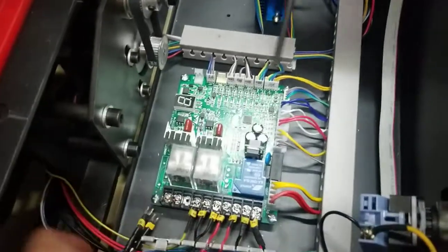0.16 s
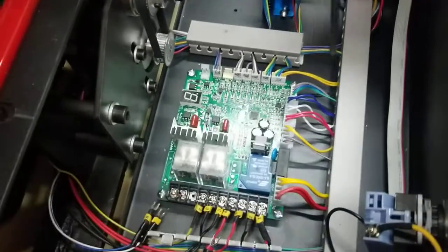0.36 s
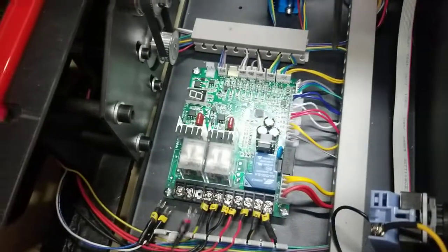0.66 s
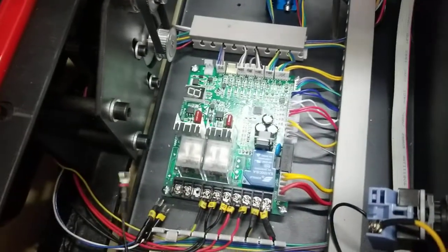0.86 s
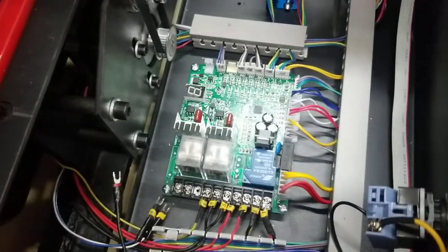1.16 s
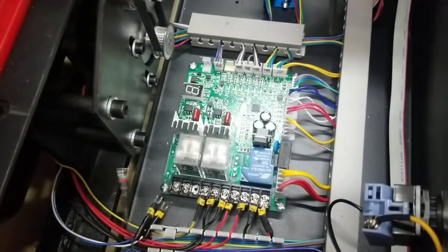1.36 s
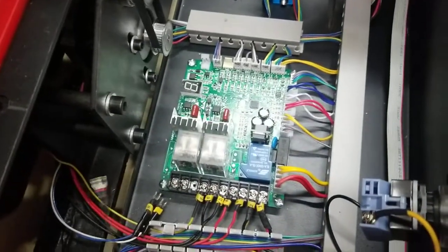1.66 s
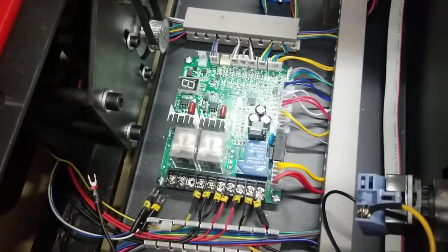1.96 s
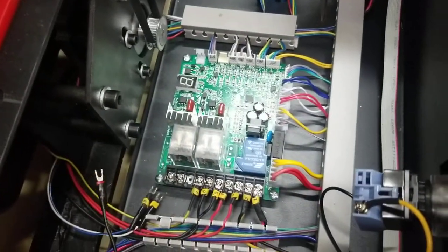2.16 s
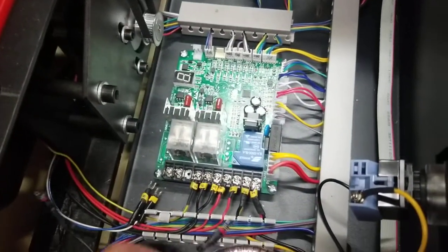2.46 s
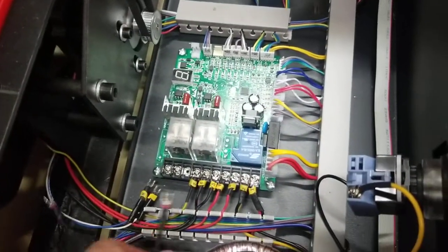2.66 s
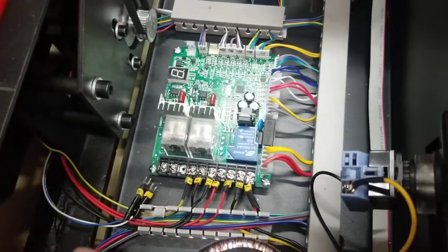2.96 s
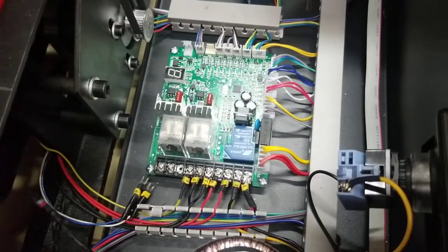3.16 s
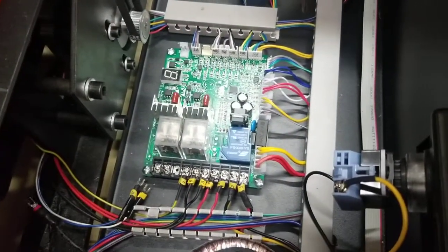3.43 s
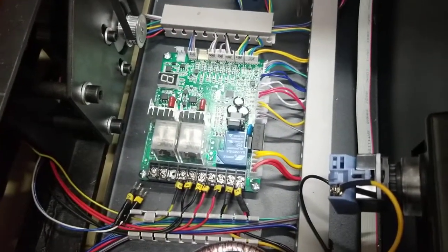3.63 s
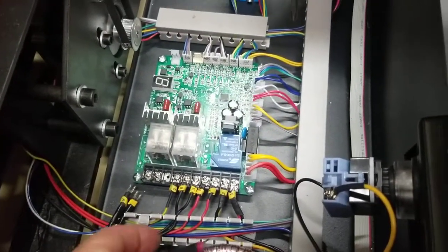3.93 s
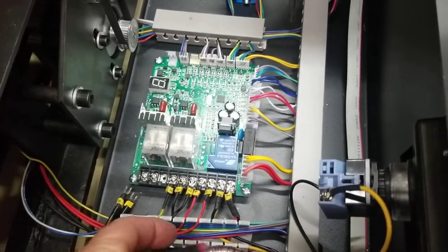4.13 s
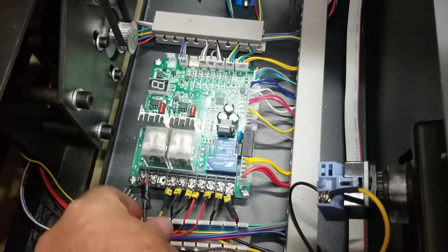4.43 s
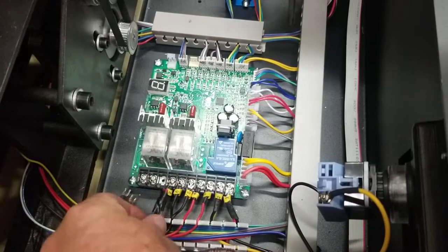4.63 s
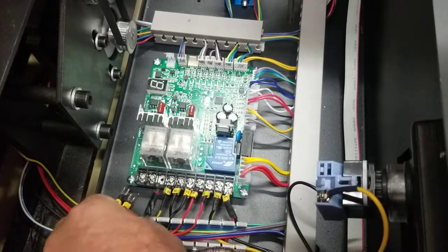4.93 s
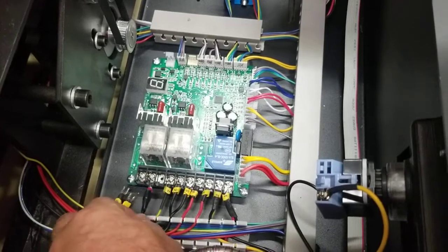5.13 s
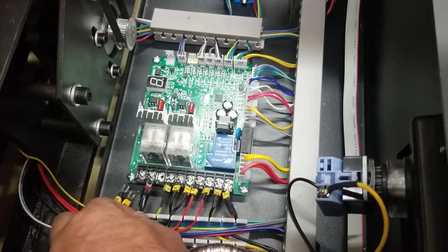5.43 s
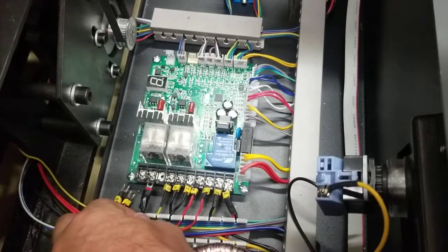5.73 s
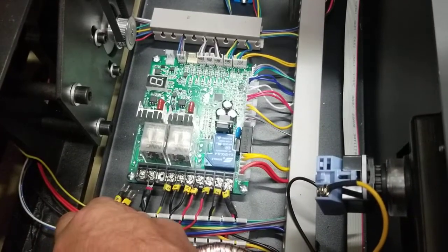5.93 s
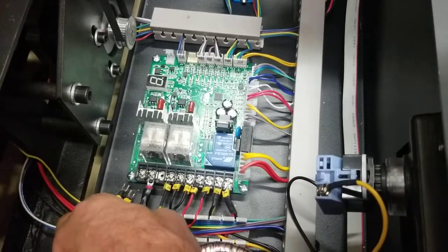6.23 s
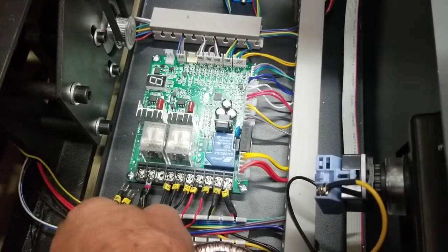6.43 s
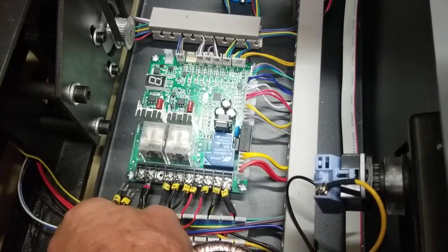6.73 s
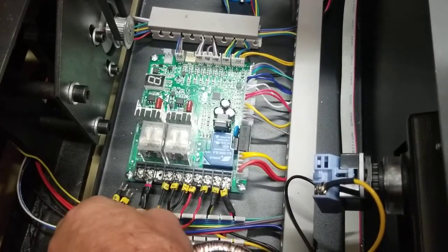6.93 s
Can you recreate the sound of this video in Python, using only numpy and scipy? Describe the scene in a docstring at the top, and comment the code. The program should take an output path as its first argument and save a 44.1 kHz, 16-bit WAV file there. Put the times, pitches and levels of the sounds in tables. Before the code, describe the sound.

A low, steady hum from a machine runs throughout, swelling slightly around 3 seconds and near the end. At the start there is a short scratchy slide and a light screwdriver clink at about 0.3 seconds. From 0.5 to 0.8 seconds stiff wires knock and rub against the cabinet housing, which rings briefly and hollowly. Scattered small ticks of metal terminals, bumps and dry snaps follow, with a very faint high whine between 1 and 2.7 seconds. The handling gets busy from 2.6 seconds, with the loudest knocks and scrapes around 2.9 to 3.1 seconds. More rubbing and knocking comes near 3.6 seconds, and softer scrapes near 4.5. After that it is quieter: dull fingertip bumps and tiny metal clicks from 6 to 7 seconds as wires go under screw terminals. The handling is close and toward the left.

```python
"""Loose wires rub over plastic ducts in a machine cabinet; at the start a screwdriver slides and then clinks.
The wires are pulled about and fed under screw terminals: their insulation sticks and slips, they knock on the
housing, which rings, and their crimped metal forks tick. Fingertips bump the wiring. A low hum runs throughout;
a faint whine comes and goes. The hand works close to the left microphone."""
import sys
import numpy as np
from scipy import signal
from scipy.fft import rfft, irfft
from scipy.io import wavfile
from scipy.ndimage import uniform_filter1d

SR = 44100
rng = np.random.default_rng(int(sys.argv[2]) if len(sys.argv) > 2 else 0)


def to_wav(s):
    """Save 16-bit WAV."""
    ch = np.atleast_2d(s).T  # columns
    pcm = np.round(np.clip(ch, -1, 1) * 32767)  # PCM
    wavfile.write(sys.argv[1], SR, pcm.astype(np.int16))


N = 312667
TIME_S = np.arange(N) / SR
RING_S = np.arange(2 ** 14) / SR  # from an impact
STROKE_S = np.arange(2 ** 15) / SR - .04  # around a slide's start

# Wire knocks. Each row: time in seconds, peak level in dB, treble against the body in dB.
KNOCKS = [(0.545, -26.5, -16), (0.564, -22, -17), (0.661, -27.5, -7.5), (0.687, -28.5, -9),
          (1.111, -35, -17), (1.4516, -33.5, -24), (1.597, -21.5, -15), (2.263, -20.5, -14.5),
          (2.664, -27.5, -14), (2.711, -21.5, -15), (2.891, -11.5, -16), (2.903, -15.5, -15),
          (3.019, -11.5, -6), (3.0248, -13.5, -5), (3.0913, -17.5, -5), (3.103, -23, -16.5),
          (3.596, -32, -12.5), (3.634, -23, -12.5), (3.669, -25.5, -14.5), (4.451, -29.5, -14.5),
          (4.531, -37.5, -10)]
# Slides. Each row: start and length in seconds, drag and fizz in dB, easing in dB per second. The first row is
# the screwdriver's shaft sliding; the rest are wires.
SLIDES = [(0.0, 0.37, -44.5, -44.5, 70), (0.36, 0.13, -61.5, -69, 18), (0.506, 0.0091, -46.5, -65.5, -10),
          (0.571, 0.015, -28.5, -52.5, 89), (0.667, 0.061, -30.5, -50.5, 27),
          (0.766, 0.058, -37, -61.5, 25), (0.99, 0.11, -57, -84, -18), (1.21, 0.088, -59.5, -69.5, 34),
          (1.449, 0.13, -41.5, -64, 87), (1.854, 0.0068, -62.5, -68.5, 56), (2.176, 0.01, -52.5, -76, 6),
          (2.225, 0.021, -47, -87, 8), (2.33, 0.23, -43.5, -71.5, 45), (2.667, 0.082, -32.5, -58, 46),
          (2.825, 0.05, -38, -59.5, -17), (2.918, 0.15, -30.5, -57.5, 23), (3.055, 0.085, -32.5, -59.5, 61),
          (3.519, 0.022, -41.5, -75, -7), (3.555, 0.16, -35, -60.5, 16.5), (3.733, 0.039, -52, -67, 32),
          (3.781, 0.0089, -36.5, -69, 38.5), (4.436, 0.073, -39, -65.5, 10.5),
          (4.549, 0.066, -37.5, -66, 5.5), (4.661, 0.044, -50, -83, 121.5), (5.576, 0.048, -62, -73.5, 5.5),
          (6.455, 0.1, -56.5, -65.5, 58), (6.888, 0.018, -72.5, -71, 59), (7.045, 0.0405, -45.5, -64, 101)]
# Fork contacts. Each row: time in seconds, peak level, mid tilt and top tilt in dB, pitch in Hz.
FORK_TICKS = [(1.099, -62, -20, -32, 6070), (1.225, -38, -8, -35, 5910), (1.452, -42, -10.5, -14, 7530),
              (1.535, -57, -21, -14, 9800), (2.6717, -42.5, -11, -19, 6140), (2.7522, -46.5, 3, -22, 4860),
              (2.7691, -42, -2.5, -21, 5140), (2.81, -42, 4, -17, 2960), (2.8238, -46, 4, -11, 2760),
              (2.852, -49, -11, -19.5, 3114), (2.891, -36.5, -4.5, -5, 12050),
              (3.0536, -49, -2, -8.5, 3400), (3.811, -48.5, -19.5, -37.5, 6580),
              (4.231, -63.5, -1.5, -25, 3220), (4.433, -59, -5, -27, 4900), (6.41, -66, -14.5, -29, 6990),
              (6.4445, -49.5, -13, -16, 7900), (6.4542, -48.5, -9.5, -28.5, 5380),
              (6.5156, -58, 2, 2.5, 12200), (6.543, -52, 0.5, -10, 12350), (6.629, -71.5, -4, -12.5, 5250),
              (6.872, -53, -8.5, -22, 2865), (6.88, -59, 5.5, -20, 6160), (7.01, -65.5, -2, -22, 4440),
              (7.038, -52, -9, -22, 4000)]
# Finger bumps and screwdriver contacts. Each row: time in seconds, peak level in dB.
FINGER_TAPS = [(0.946, -45.5), (2.221, -42.5), (2.629, -37.5), (4.202, -46), (5.031, -50), (5.252, -65.5),
               (5.599, -59), (6.165, -37.5), (6.972, -56), (7.036, -40.5)]
CLINKS = [(0.3025, -45.5), (0.3261, -46), (0.3455, -45.5)]
# Dry snaps. Each row: time in seconds, level in dB, high-pass cutoff in Hz.
SNAPS = [(0.223, -34, 6260), (0.58, -38, 6000), (1.147, -50, 6100), (2.1328, -34.5, 500),
         (3.637, -35, 10000), (3.705, -51, 7000), (3.728, -41, 7000)]
# Swell of the hum. Each row: time in seconds, level in dB.
HUM_SWELL = [(0.0, -46), (1.72, -48), (3.12, -39.5), (4.34, -45.5), (4.64, -47.5), (6.65, -39), (7.09, -40)]
# Cabinet resonances. Each row: frequency in Hz, height in dB, width in Hz.
CABINET_MODES = [(182.7, 21.5, 2.3), (209.6, 26.5, 4), (226, 14.5, 5.7), (250, 12.5, 13),
                 (266.4, 15.5, 2.1), (320.2, 18, 5.3), (381.1, 10.5, 6), (424, 7.5, 18), (437, 6.5, 29),
                 (472, 14, 12), (583, 4.5, 11), (635.8, 15, 26), (702.5, 3, 12), (738, 13, 13),
                 (853, 14, 65), (961, 8.5, 16), (974, 15.5, 35), (1045, 19.5, 46), (1189, 14, 55),
                 (1352, 12.5, 110), (1498, 10.5, 22), (1603, 11, 56), (1697, 11, 18), (1846, 10, 19),
                 (2150, 7.5, 440), (2466, 6, 230), (2827, 8, 81), (3015, 9, 50), (3446, 5, 430)]
# Cabinet's late decay. Each row: band centre in Hz, T60 in seconds.
CABINET_TAIL = [(150, .55), (500, 0.71), (1200, 0.21), (3500, 0.3), (12000, 0.11)]
# Panel and screwdriver modes. Each row: frequency in Hz, level in dB, T60 in seconds.
PANEL_MODES = [(468.5, -14.5, 0.23), (694, -1, .11), (970.5, 1.5, 0.21), (1060, -11, .14),
               (1836, -19.5, .12), (2110, -37, .7)]
SHAFT_MODES = [(2120, -4.5, 0.15), (3880, 1, 0.07), (3910, 3.5, 0.13), (5780, -1, 0.11), (6270, -1, 0.15),
               (7400, -6, 0.12)]
# Source spectra. Each row: frequency in Hz, level in dB.
KNOCK_SPECTRUM = [(90, -28), (125, -4.5), (160, -13.5), (210, -2), (320, -1), (500, 3.5), (700, 7.5),
                  (1000, 4), (1300, -1), (1900, -18), (3000, -30), (4000, -31), (7000, -34.5),
                  (9000, -48.5), (12500, -44.5), (16000, -57.5)]
DRAG_SPECTRUM = [(90, -38.5), (125, 2.5), (160, -9.5), (210, -9.5), (320, 3), (450, -1), (630, 4.5),
                 (800, -5), (1000, -6), (1300, -9), (2000, -19), (3500, -34), (7000, -71.5)]
FIZZ_SPECTRUM = [(450, -19), (900, 0), (1900, 1.5), (2600, -1.5), (3700, -3.5), (5000, -3.5), (7200, -7.5),
                 (9000, -23), (13000, -15.5), (16000, -28.5)]
CRACKLE_SPECTRUM = [(600, -24), (1500, 10.5), (2400, 3), (3600, -1.5), (5000, -12.5), (7000, -12.5),
                    (9000, -33), (16000, -37.5)]
TICK_SPECTRUM = [(500, -12), (1500, -3.5), (3500, -7.5), (6500, -5.5), (7700, -8), (9000, -15.5),
                 (12500, 2), (16000, -7)]
TAP_SPECTRUM = [(150, -20), (400, 3), (650, 2.5), (1300, -18.5), (2000, -33.5), (9000, -57)]
RUMBLE_SPECTRUM = [(12, -46.5), (20, -30.5), (38, -27.5), (47, -12.5), (85, -11.5), (96, -11), (117, -2),
                   (131, -19), (146, -20), (323, -32.5), (566, -47), (630, -59), (1500, -62.5),
                   (1950, -104), (3300, -120)]
HISS_SPECTRUM = [(900, -11), (1800, 6.5), (2600, 2), (4000, 1), (7000, -2), (9000, -14), (12000, 3),
                 (16000, -1)]
# Treble loss in soft insulation. Each row: frequency in Hz, gain in dB.
CUSHION = [(1200, 2), (2400, -2), (7000, -24)]
# Brightening with firmer contact. Each row: frequency in Hz, gain in dB per dB of drag.
BITE = [(200, -0.29), (420, -0.1), (650, 0.028), (1100, 0.23), (2500, 0.29)]
# Likeness of the two microphones. Each row: frequency in Hz, correlation from 0 to 1.
MIC_CORRELATION = [(130, .99), (300, .95), (640, .55), (1400, .4), (3000, .1), (16000, 0)]
# Leftward lean of the handling. Each row: frequency in Hz, left minus right in dB.
HAND_LEAN = [(150, 1.5), (380, 2), (600, 7), (1200, 6.5), (2400, 8), (5000, 9.5), (9000, 6), (15000, 8)]


def wire_knocks(gain_db=-4, usual_treble_db=-19, soft_rise_s=0.0057, sharp_rise_s=0.00053):
    """Stiff wire hits the housing: light bumps swell softly, hard ones start at once and thud more."""
    out = np.zeros((2, N))
    hz, db = np.transpose(KNOCK_SPECTRUM)
    for time_s, peak_db, treble_db in KNOCKS:
        hardness_db = (treble_db - usual_treble_db) * curve([(1000, 0.22), (2500, 2.14), (5000, 0.8)], hz)
        thud_db = (peak_db + 28) * curve([(210, 0.03), (330, 0.063), (600, 0.025)], hz)
        blow = impulse(np.c_[hz, db + hardness_db + thud_db], early_t60_s=.08, tail_db=-16, direct=4)
        rise_s = np.interp(peak_db, [-34, -20], [soft_rise_s, sharp_rise_s])
        knock = strike(blow, 0, rise_s) + panel_ring()
        add(out, time_s, strike(knock, peak_db + gain_db, rise_s))
    return out


def panel_ring(gain_db=-6):
    """The struck panel rings hollow in a few decaying modes."""
    hz, db, t60_s = np.transpose(PANEL_MODES)[:, :, None]
    decay = amp(gain_db + db - 60 * RING_S / t60_s)
    modes = decay * np.sin(2 * np.pi * (hz * RING_S + rng.random(hz.shape)))
    return modes.sum(0) * np.clip(3 - 3 * RING_S / RING_S[-1], 0, 1)


def wire_slides(fizz_gain_db=-1, crackle_gain_db=-26):
    """Insulation judders over duct edges: coarse slips shake the housing, fine ones fizz, some crackle."""
    rub, fizz_level, grip = np.zeros((2, N)), np.zeros((1, N)), np.zeros((1, N))
    coarse = unit(slips(rate_hz=1100, spread_db=1.5) * wander(spread_db=1, rate_hz=65))
    for start_s, length_s, drag_db, fizz_db, easing_db_per_s in SLIDES:
        onset_s = start_s + STROKE_S[0]
        contact = pressure(length_s, easing_db_per_s)
        force = contact * np.roll(coarse, -round(start_s * SR))[:len(STROKE_S)]
        add(rub, onset_s, housing_rub(force, drag_db))
        add(grip, onset_s, amp(drag_db) * contact[None])
        add(fizz_level, onset_s, amp(fizz_db) * pressure(length_s, 0.99 * easing_db_per_s)[None])
    fine = np.array([slips(rate_hz=12000, spread_db=4) for side in (0, 1)])
    fizz = fizz_level * np.sqrt(2) * unit(cabinet(colour(fine, FIZZ_SPECTRUM)))
    catch = impulse(CRACKLE_SPECTRUM, early_t60_s=.025, tail_db=-30)
    catch /= np.linalg.norm(catch[0])
    crackle = signal.fftconvolve(grip * slips(rate_hz=65, spread_db=2.5), catch, axes=1)[:, :N]
    return rub + amp(fizz_gain_db) * fizz + amp(crackle_gain_db) * crackle


def pressure(length_s, easing_db_per_s, release_db_per_s=306):
    """Contact force of one slide: it catches, eases while the wire runs, and lets go."""
    catch_s = 0.035 + 0.03 * length_s
    eased_db = easing_db_per_s * np.clip(STROKE_S, 0, length_s)
    released_db = release_db_per_s * np.clip(STROKE_S - length_s, 0, 1)
    return np.clip(1 + STROKE_S / catch_s, 0, 1) ** 2 * amp(-eased_db - released_db)


def slips(rate_hz, spread_db):
    """Stick-slip friction: a random train of tiny, uneven releases."""
    size = amp(spread_db * np.minimum(rng.exponential(1, N), 4)) * rng.choice([-1, 1], N)
    return unit(size * (rng.random(N) < rate_hz / SR))


def housing_rub(force, drag_db, firm_db=-26):
    """Slips enter the housing through the insulation; each spot differs, and gentle contact is duller."""
    body = impulse(DRAG_SPECTRUM, early_t60_s=.05, tail_db=-24, direct=12)
    body /= np.linalg.norm(body.mean(0))
    hz, bite = np.transpose(BITE)
    force = colour(colour(force, CUSHION), np.c_[hz, bite * (drag_db - firm_db)])
    return amp(drag_db) * signal.fftconvolve(force[None], body, axes=1)


def fork_ticks(gain_db=-3, ring_db=-7, t60_at_4khz_s=0.04):
    """Metal forks touch screws and each other: a click and a brief ring, shorter at higher pitch."""
    out = np.zeros((2, N))
    hz, db = np.transpose(TICK_SPECTRUM)
    for time_s, peak_db, mid_db, top_db, pitch_hz in FORK_TICKS:
        tilt_db = curve([(3500, mid_db + 5), (6000, 0.0033), (7700, 0.026), (12000, top_db + 7)], hz)
        click = impulse(np.c_[hz, db + tilt_db], early_t60_s=0.049, tail_db=-27)
        prong = np.sin(2 * np.pi * (pitch_hz * RING_S + rng.random((2, 1))))
        prong *= amp(-60 * RING_S / t60_at_4khz_s * pitch_hz / 4000)
        tick = unit(click) + amp(ring_db) * unit(prong)
        add(out, time_s, strike(tick, peak_db + gain_db, rise_s=.0016))
    return out


def finger_taps():
    """Fingertips bump the wiring: short, dull, too light to ring the panel."""
    out = np.zeros((2, N))
    for time_s, peak_db in FINGER_TAPS:
        bump = impulse(TAP_SPECTRUM, early_t60_s=0.15, tail_db=-20)
        add(out, time_s, strike(bump, peak_db, rise_s=0.0041))
    return out


def screwdriver(gain_db=-3, click_db=-3, detune=0.0108):
    """A steel shaft touches metal: a click, and modes that chatter as it scrapes."""
    out = np.zeros((2, N))
    hz, db, t60_s = np.transpose(SHAFT_MODES)[:, :, None]
    decay = amp(db - 60 * RING_S / t60_s)
    for time_s, peak_db in CLINKS:
        phase = rng.random((2, len(hz), 1))
        mode_hz = hz * (1 + detune * rng.standard_normal(hz.shape))
        ring = (decay * np.sin(2 * np.pi * (mode_hz * RING_S + phase))).sum(1)
        click = impulse(FIZZ_SPECTRUM, early_t60_s=.11, tail_db=-14)
        chatter = 1 + unit(uniform_filter1d(rng.standard_normal(ring.shape), size=130))
        clink = unit(ring * chatter) + amp(click_db) * unit(click)
        add(out, time_s, strike(clink, peak_db + gain_db, rise_s=0.00023))
    return out


def snaps(decay_s=0.00016):
    """Tiny dry snaps with no ring."""
    out = np.zeros((2, N))
    for time_s, db, cutoff_hz in SNAPS:
        burst = rng.standard_normal((2, len(RING_S))) * np.exp(-RING_S / decay_s)
        highpass = signal.butter(2, cutoff_hz, "high", fs=SR)
        add(out, time_s, amp(db) * signal.lfilter(*highpass, burst))
    return out


def wire_stirring():
    """Held wires never lie quite still: faint slips throughout."""
    force = wander(spread_db=4.5, rate_hz=13) * slips(rate_hz=520, spread_db=7)
    return housing_rub(force, drag_db=-75)[:, :N]


def impulse(spectrum, early_t60_s, tail_db, direct=0):
    """One impulse in the cabinet: optional direct pulse, quick reflections, a tail band by band."""
    size = len(RING_S)
    hz, centres_hz = np.fft.rfftfreq(size, 1 / SR), np.transpose(CABINET_TAIL)[0]
    pulse = direct * signal.unit_impulse(size, 70)
    noise = unit(colour(noise_pair(size) + pulse, spectrum))
    out = noise * amp(-60 * RING_S / early_t60_s)
    for share, (_, t60_s) in zip(np.eye(len(CABINET_TAIL)), CABINET_TAIL):
        band = irfft(rfft(noise) * curve(np.c_[centres_hz, share], hz), size)
        out += band * amp(tail_db - 60 * RING_S / t60_s)
    return cabinet(out) * np.clip(3 - 3.3 * RING_S / RING_S[-1], 0, 1)


def cabinet(x):
    """The cabinet's resonances ring; the balance between octaves is kept."""
    bins_hz, grid_hz = np.fft.rfftfreq(x.shape[-1], 1 / SR), np.geomspace(20, SR / 2, num=4000)
    gain = 1 + sum(amp(db) / (1 + 2j * (grid_hz - hz) / width_hz) for hz, db, width_hz in CABINET_MODES)
    gain /= np.sqrt(uniform_filter1d(abs(gain) ** 2, size=400))
    return irfft(rfft(x) * np.interp(bins_hz, grid_hz, gain), x.shape[-1])


def whine(centre_hz=5730, jitter_hz=14, level_db=-74.5, start_s=0.95, end_s=2.72):
    """A thin, faint whine flickers in level at a near-steady pitch."""
    knots_s = np.linspace(start_s, end_s, num=230)
    flicker = rng.uniform(.1, 1.9, len(knots_s)) * signal.windows.tukey(len(knots_s), .18)
    pitch_hz = centre_hz + jitter_hz * np.interp(TIME_S, knots_s, rng.standard_normal(len(knots_s)))
    tone = np.sin(2 * np.pi * np.cumsum(pitch_hz) / SR)
    return amp(level_db) * np.interp(TIME_S, knots_s, flicker) * tone


def hum_and_room(hum_hz=115.94, drone_hz=51.3, drone_db=-58, rumble_db=-48, hiss_db=-78):
    """A hum over a weaker, steady drone; room rumble and faint hiss swell with the hum."""
    hum_db = np.interp(TIME_S, *np.transpose(HUM_SWELL))
    swell_db = hum_db - hum_db.mean()
    hum = amp(hum_db + 1) * np.sin(2 * np.pi * hum_hz * TIME_S)
    drone = amp(drone_db) * np.sin(2 * np.pi * drone_hz * TIME_S)
    air = colour(noise_pair(N), RUMBLE_SPECTRUM)
    air = colour(air, [(95, -5.5), (115, -10), (150, -8), (1500, 2), (4000, -27.5)])
    rumble = amp(rumble_db + swell_db) * unit(air)
    hiss = amp(hiss_db + 0.94 * swell_db) * unit(colour(noise_pair(N), HISS_SPECTRUM))
    return (np.sqrt(2) * (hum + drone) + rumble + hiss) * amp([[.6], [-.6]])


def noise_pair(size):
    """Noise at two close microphones: alike in the bass, unrelated in the treble."""
    left, other = rfft(rng.standard_normal((2, size)))
    shared = np.clip(curve(MIC_CORRELATION, np.fft.rfftfreq(size, 1 / SR)), 0, 1)
    return irfft([left, shared * left + np.sqrt(1 - shared ** 2) * other], size)


def strike(x, peak_db, rise_s):
    """Softens the attack and sets the rms of the loudest 6 ms."""
    x = x * (1 - np.exp(-RING_S / rise_s))
    return amp(peak_db) * x / np.sqrt(uniform_filter1d(x.mean(0) ** 2, size=260).max())


def wander(spread_db, rate_hz):
    """A randomly drifting gain."""
    knots = rng.standard_normal(2000)
    return amp(spread_db * np.interp(TIME_S * rate_hz, np.arange(len(knots)), knots))


def colour(x, spectrum):
    """Filters by (Hz, dB) points."""
    hz = np.fft.rfftfreq(x.shape[-1], 1 / SR)
    return irfft(rfft(x) * amp(curve(spectrum, hz)), x.shape[-1])


def curve(points, hz):
    """Interpolates (Hz, value) points over log frequency."""
    points_hz, values = np.transpose(points)
    return np.interp(np.log(hz + 1), np.log(points_hz), values)


def add(mix, time_s, sound):
    """Mixes a sound in at time_s, cropped to fit."""
    at = round(time_s * SR)
    sound = sound[:, max(-at, 0):]
    part = mix[:, max(at, 0):][:, :sound.shape[1]]
    part += sound[:, :part.shape[1]]


def amp(db):
    """Decibels to gain."""
    return 10 ** (np.asarray(db) / 20)


def unit(x):
    """Scales to unit rms."""
    return x / np.sqrt(np.mean(x ** 2) + 1e-20)


def scene(right_lag_s=0.00021):
    """Handling and whine lean left and reach the right microphone later; the hum is near the middle."""
    near = wire_knocks() + finger_taps() + fork_ticks() + screwdriver()
    near = near + wire_slides() + wire_stirring() + snaps() + whine()
    near[1] = np.interp(TIME_S - round(right_lag_s * SR) / SR, TIME_S, near[1])
    hz, lean_db = np.transpose(HAND_LEAN)
    gains = amp([lean_db / 2, -lean_db / 2])
    gains_db = 20 * np.log10(gains / np.sqrt(np.mean(gains ** 2, axis=0)))  # constant power
    panned = np.array([colour(side, np.c_[hz, db]) for side, db in zip(near, gains_db)])
    return panned + hum_and_room()


def record(dry, cutoff_hz=16150):
    """Low-pass band limit."""
    lowpass = signal.firwin(511, cutoff_hz, window=("kaiser", 9), fs=SR)
    return signal.oaconvolve(dry, lowpass[None], "same")


dry = scene()
out = record(dry)
to_wav(out)
```